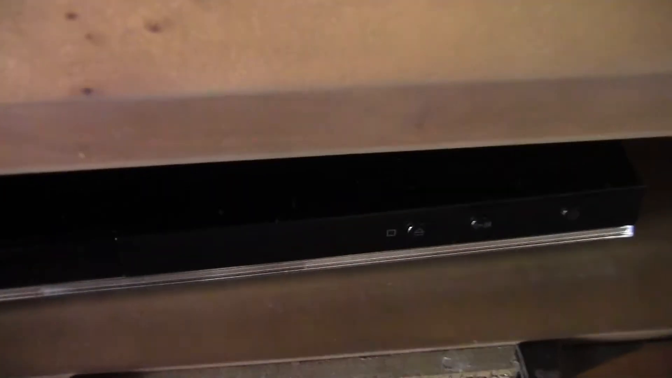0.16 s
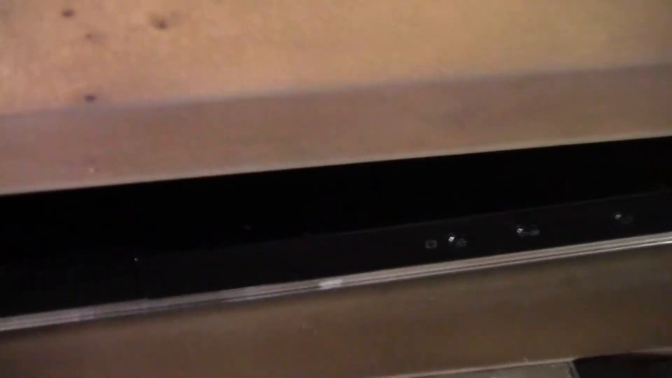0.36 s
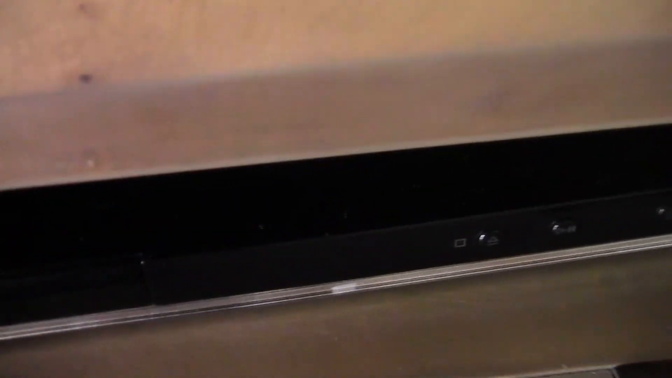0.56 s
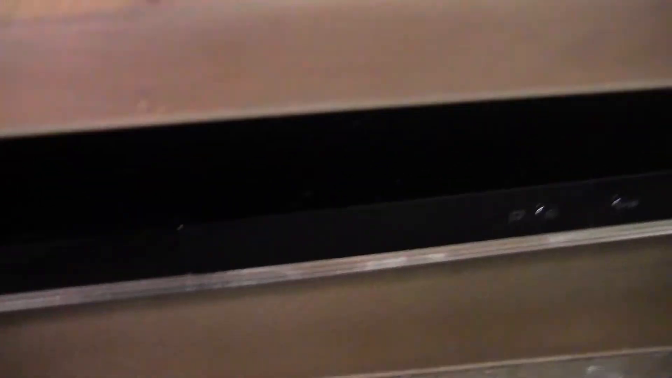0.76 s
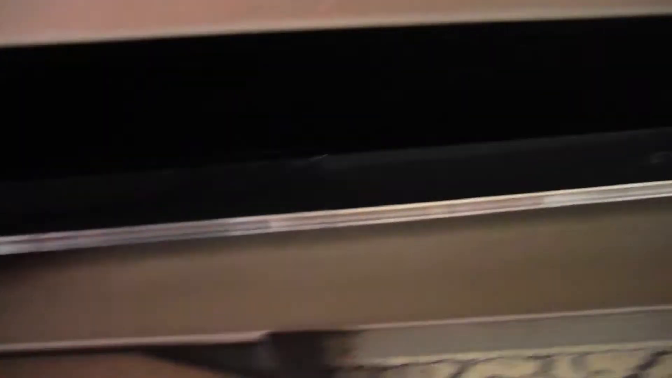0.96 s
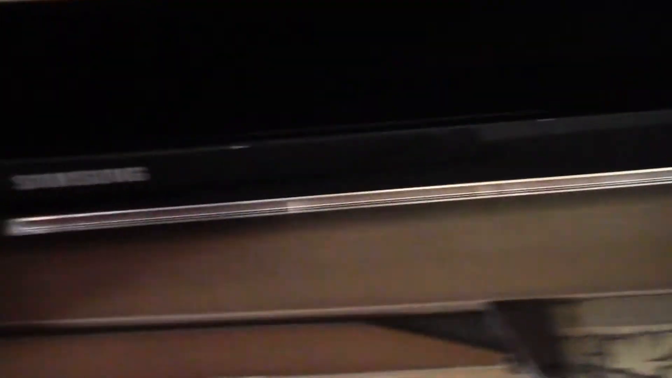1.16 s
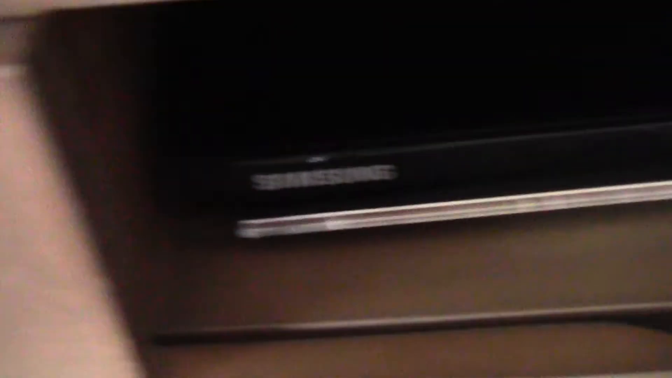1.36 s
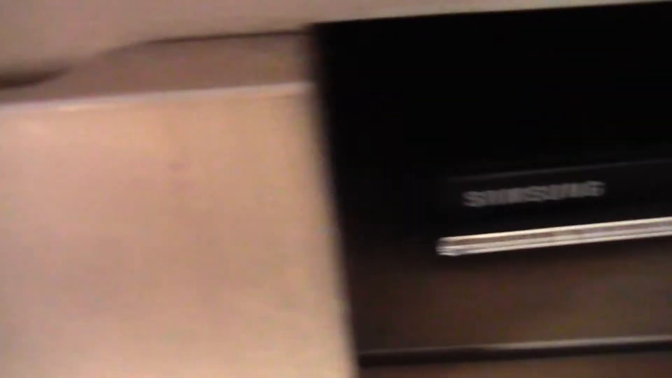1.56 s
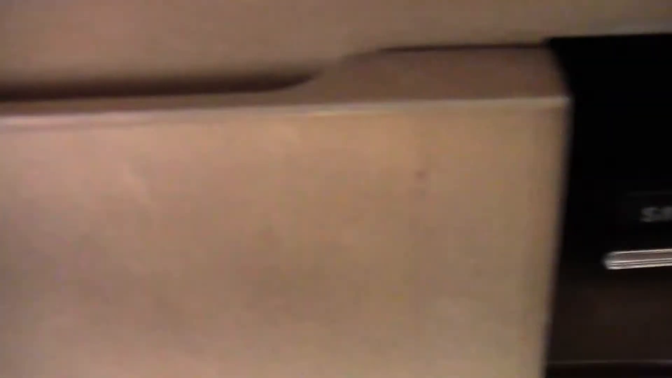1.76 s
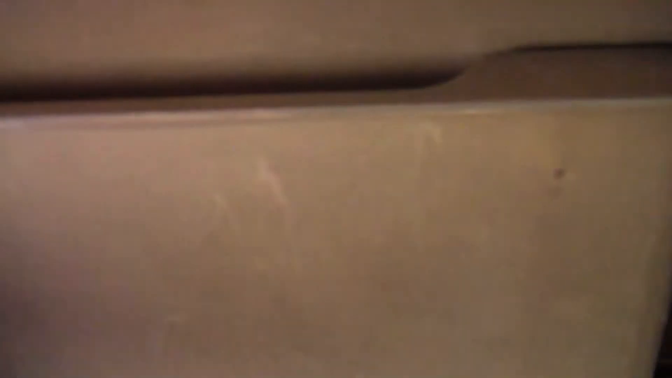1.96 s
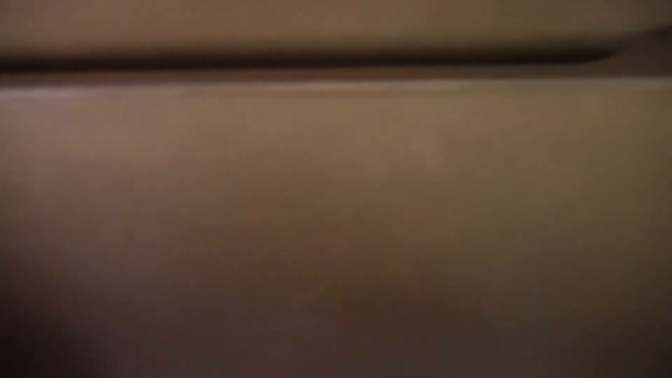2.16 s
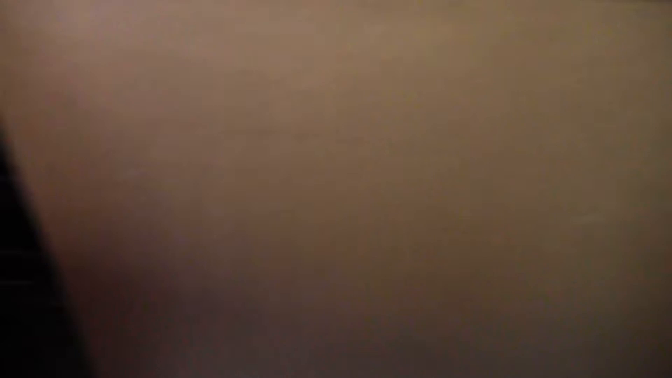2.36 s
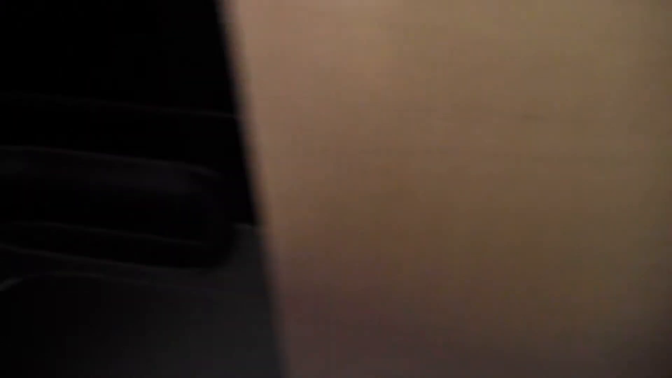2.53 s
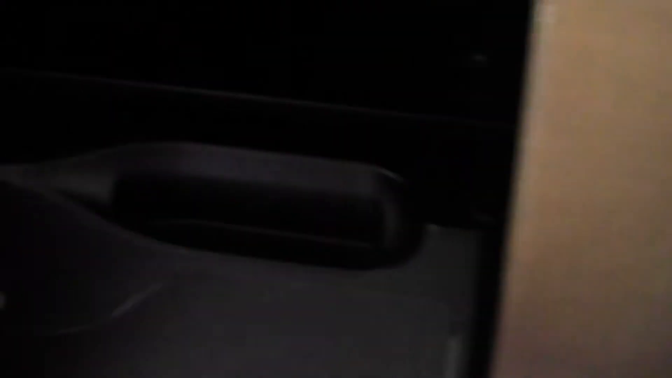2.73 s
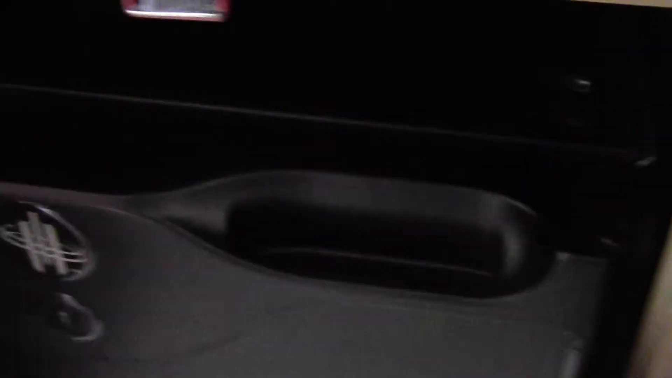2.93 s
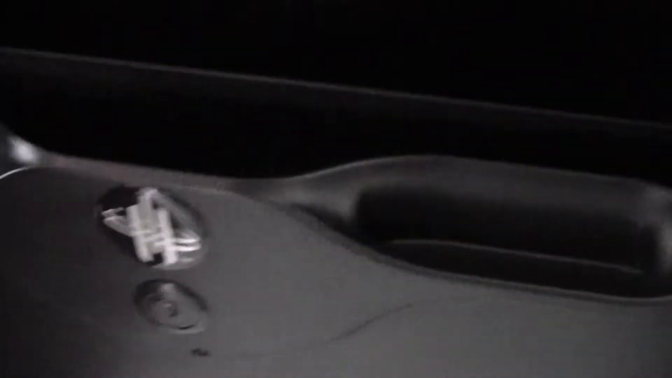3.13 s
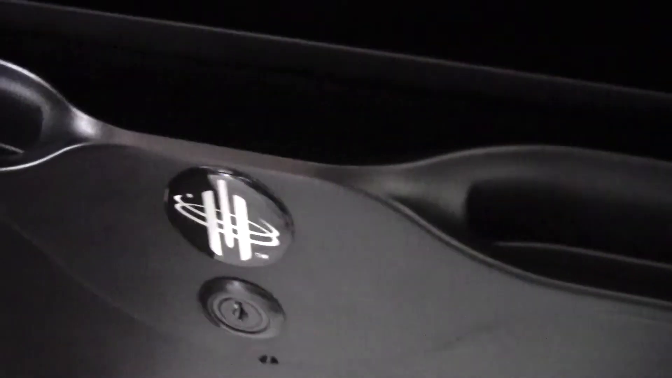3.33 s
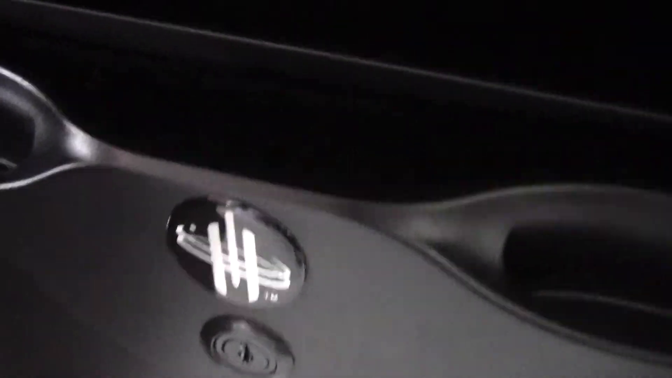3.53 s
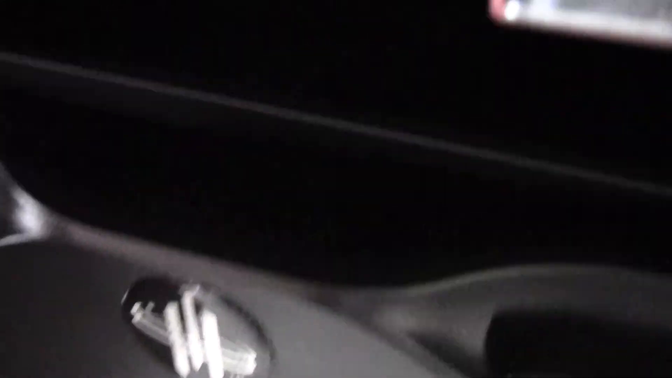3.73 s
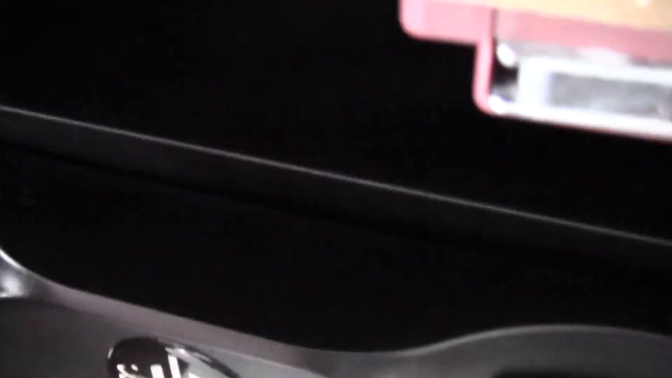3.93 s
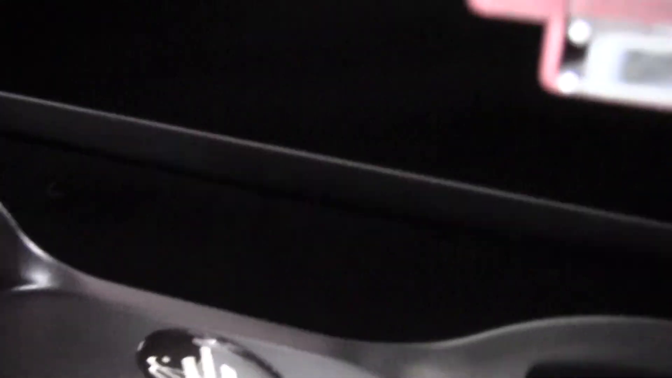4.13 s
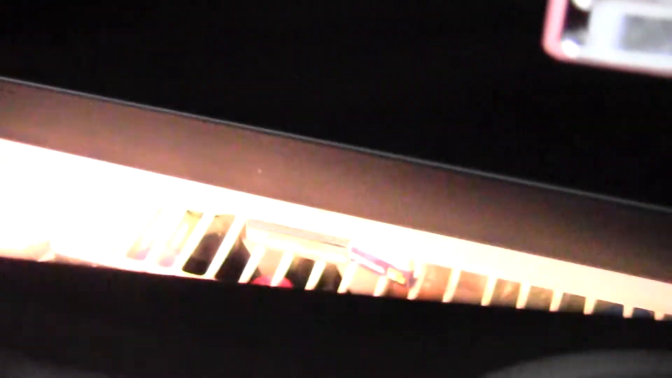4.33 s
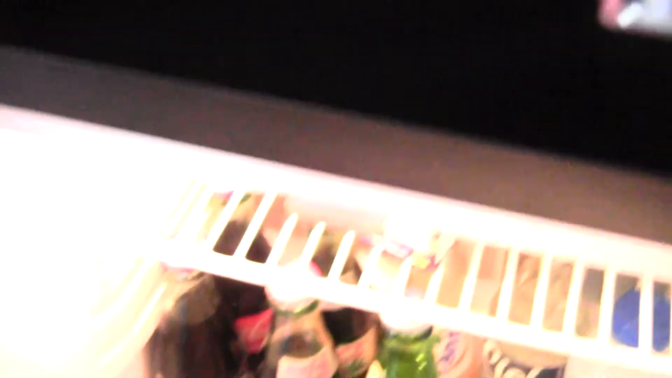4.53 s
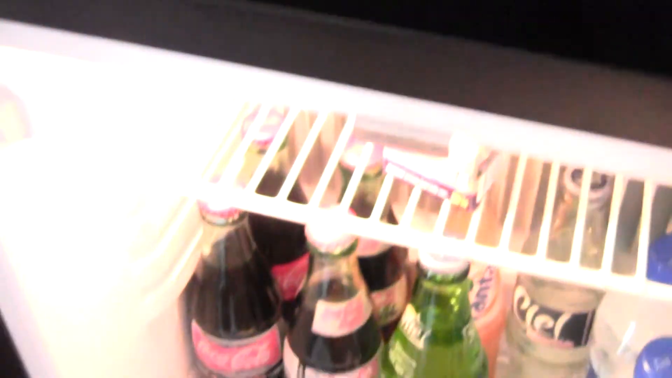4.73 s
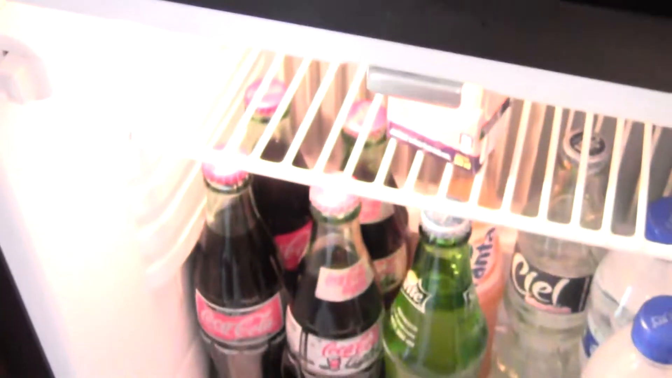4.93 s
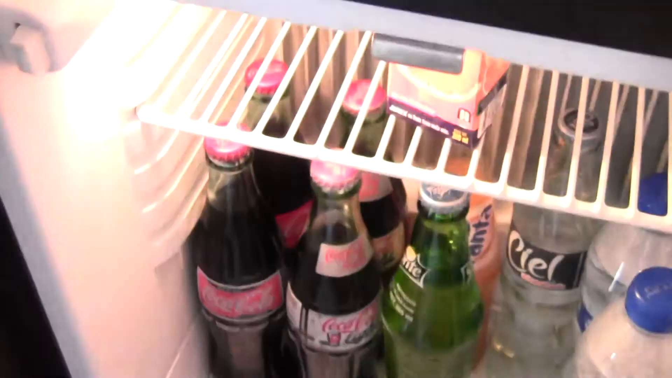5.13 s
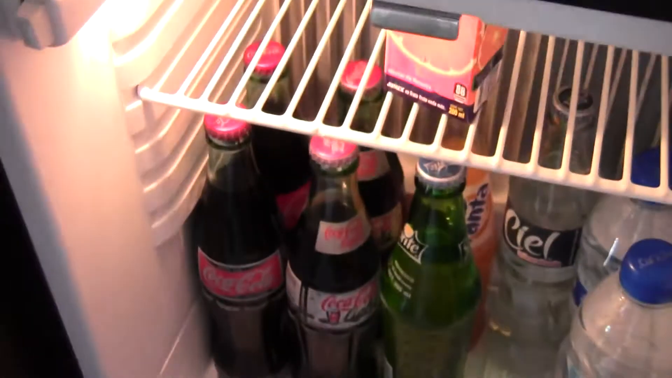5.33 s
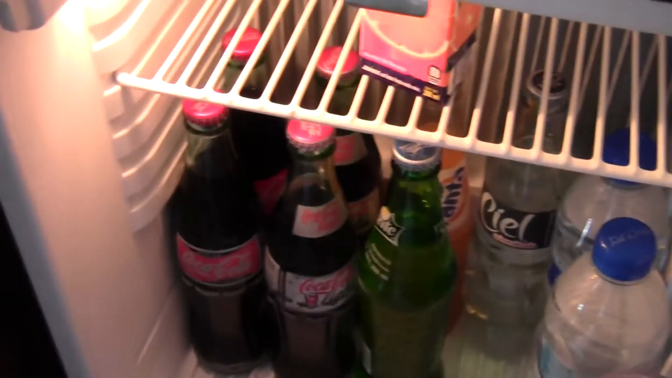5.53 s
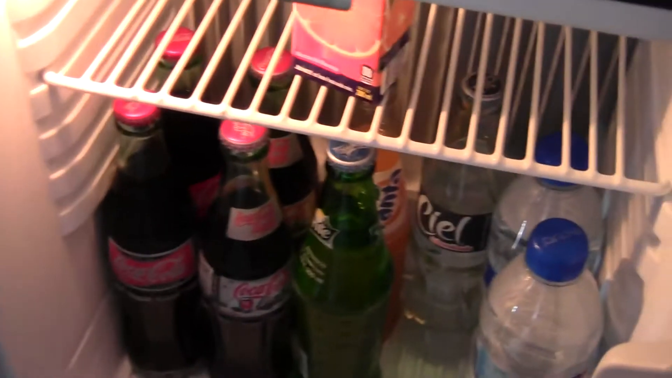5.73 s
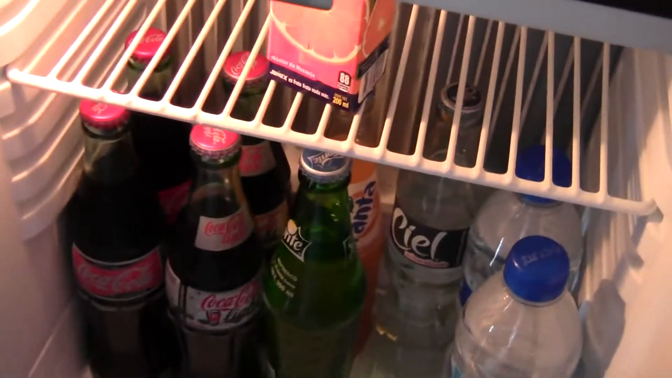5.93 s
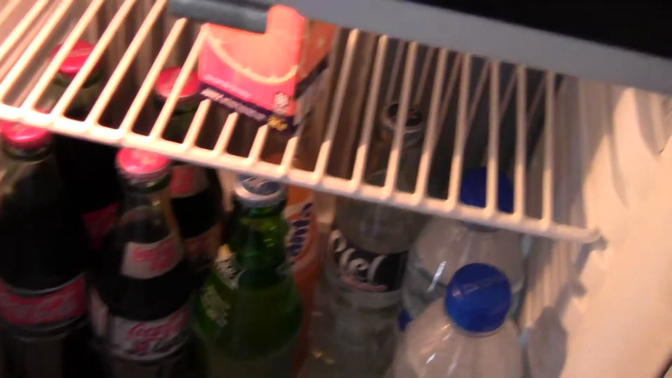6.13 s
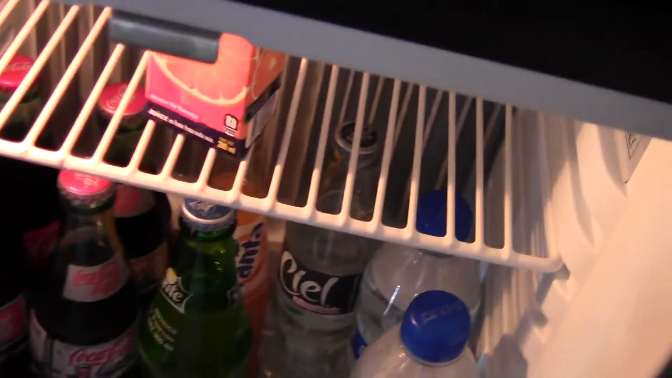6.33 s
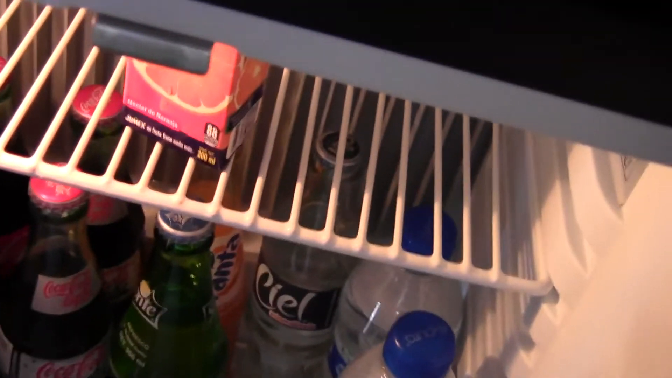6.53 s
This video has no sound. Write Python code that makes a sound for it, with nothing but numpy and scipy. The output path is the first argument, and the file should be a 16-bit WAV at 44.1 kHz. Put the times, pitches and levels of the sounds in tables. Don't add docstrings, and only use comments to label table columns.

```python
import sys
import numpy as np
from scipy import signal
from scipy.io import wavfile
from scipy.ndimage import uniform_filter1d

SR = 44100
rng = np.random.default_rng(int(sys.argv[2]) if len(sys.argv) > 2 else 0)


def volts_from_db(level):
    exponent = np.asarray(level, float) / 20
    return 10 ** exponent


def wav_record(signal):
    frames = np.transpose(np.atleast_2d(signal))
    bounded = np.clip(frames, -1, 1)
    quanta = np.round(bounded * 32767).astype(np.int16)
    wavfile.write(sys.argv[1], SR, quanta)


N = 294489

# frequency in Hz, density in dB per Hz.
AIR_COLOUR = [(20, -54.5), (45, -24), (70, -24.5), (100, 9.5), (150, -8), (300, -3.5), (400, -11.5),
              (560, -10), (800, -13.5), (1800, -19.5), (3000, -27), (7000, -39.5), (11000, -45),
              (15500, -54.5)]
# time in seconds, air level in dB, mains hum in dB, fan whine in dB.
ROOM_LEVELS = [(0, -50, -46, -62), (.7, -49.5, -47, -57.5), (1.3, -50.5, -46.5, -61.5),
               (1.5, -49.5, -46, -71), (2.25, -49, -46, -72), (2.4, -49.5, -48.5, -61),
               (2.8, -50.5, -50.5, -61.5), (3.2, -49.5, -49, -58.5), (3.6, -50.5, -50.5, -74),
               (4, -49, -48.5, -72), (5.3, -49.5, -48.5, -73), (6.68, -50.5, -51, -70)]
# frequency in Hz, width in Hz.
HUM_LINES = [(119.6, 6), (240, 3), (560, 2), (527, 8)]
OCTAVE_DB, OCTAVE_SWING = -55, 1.9
SECOND_DB, SECOND_FADE_DB_PER_S, SECOND_REST_DB = -60, 6.5, -72.5
# frequency in Hz, left-right likeness from 0 to 1.
LIKENESS = [(60, 0.94), (180, 0.99), (550, 0.41), (1650, 0.64), (4970, 0.673), (15000, 0.35)]
# frequency in Hz, t60 in seconds.
ROOM_DECAY = [(100, 0.52), (500, 0.7), (2000, 0.36), (6000, 0.2), (12000, 0.39)]

# frequency in Hz, density in dB per Hz.
CLOTH_COLOUR = [(880, -13.5), (1500, -3.5), (2700, -10.5), (4120, -13), (4500, -14), (9090, -18),
                (15000, -27)]
# start in seconds, hold in seconds, level in dB.
BRUSH_STROKES = [(0, 0.092, -59.5), (.2, 0.19, -63), (.66, 0.22, -63), (.95, 0.15, -66.5),
                 (1.297, 0.22, -65.5), (2.12, 0.024, -59.5), (2.3, 0.44, -66), (2.897, 0.09, -59.5),
                 (3.117, 0.1, -61.5), (3.4, 0.16, -66), (3.72, 0.026, -64), (4.024, 0.059, -64),
                 (5.05, 0.09, -65), (5.6, 0.019, -70), (5.72, .02, -75), (6.1, 0.052, -71.5)]
BRUSH_RISE_DB_PER_S, BRUSH_FALL_DB_PER_S = 97, 45.5

# start in seconds, peak in dB, main mode in Hz, second mode in Hz, t60 in seconds.
CAMERA_BUMPS = [
    (3.2049, -14, 245, 362, 0.025),
    (5.8605, -23.5, 350, 270, 0.066),
    (5.8615, -34, 620, 890, 0.036),
    (5.889, -27, 778, 710, 0.054),
    (5.896, -24.5, 420, 820, 0.022),
]
# start in seconds, peak in dB, main mode in Hz, second mode
# in Hz, t60 in seconds.
DULL_BLOWS = [(1.653, -22.5, 109.3, 74, 0.29), (1.743, -26, 82, 117, 0.22), (1.821, -24, 239.5, 313, 0.23),
              (1.851, -25, 63.5, 121, 0.18), (1.937, -10.5, 255, 300.4, 0.13), (1.939, -10, 610, 490, .06),
              (1.946, -15, 615, 760, 0.046), (1.95, -22, 63.7, 151, 0.15), (1.985, -13, 293, 160.5, 0.14),
              (2.27, -39, 88, 120, 0.17), (2.967, -42, 80, 149, .16), (3.931, -45, 64.3, 99.3, 0.9),
              (4.046, -43, 246, 400, 0.17), (4.189, -23.5, 143, 92, 0.11), (4.193, -34, 216, 326, 0.2),
              (4.292, -21, 237.4, 120, 0.17), (4.394, -19.5, 677, 790, 0.068),
              (4.5415, -9, 784, 1100, 0.02), (4.801, -32, 1336, 2066, .12), (4.69, -30.5, 777, 640, 0.072),
              (4.772, -25.5, 650, 780, 0.052), (4.322, -16.5, 114.8, 185, 0.251),
              (5.899, -26.5, 152, 70, 0.21), (5.911, -34.5, 193, 223, .25), (6.106, -32.5, 150, 77.2, .38),
              (6.141, -39, 186, 304, 0.2)]
SECOND_MODE_DB = -4.5
# start in seconds, lower mode in dB, upper mode in dB.
FRIDGE_DOOR_BOOMS = [(4.427, -22, -15.5), (4.525, -18, -13.5), (4.627, -21, -12.5), (4.671, -21, -33),
                     (4.761, -38, -19.5), (4.874, -23, -14), (4.914, -22, -45), (4.943, -17, -25),
                     (5.139, -48, -36), (5.24, -47.5, -35), (5.331, -55, -38), (5.551, -45, -41.5)]
DOOR_LOW_HZ, DOOR_HIGH_HZ, DOOR_LOW_T60_S, DOOR_HIGH_T60_S, DOOR_RISE_S = 152, 185, 0.27, 0.18, 0.006

# frequency in Hz, width in Hz, level in dB.
WOOD_MODES = [(151, 13, -10), (255, 37, 1.5), (293, 13, -2.5), (400, 22, -10), (610, 100, 0.5),
              (764, 92, -9), (883, 26, -9), (1150, 170, -3), (1510, 190, 1), (1780, 190, -1),
              (2160, 440, -6.5), (2570, 310, -2.5), (3150, 1800, -9), (4200, 1500, -34)]
# start in seconds, peak in dB, treble crack in dB above the body,
# pitch of the struck spot in Hz, t60 in seconds.
CABINET_KNOCKS = [(1.469, -45.5, -20, 2400, .17), (1.4695, -47.5, -28, 1040, 0.88),
                  (1.936, -3.5, -14.5, 4680, 0.022), (1.938, -8, -22, 2740, 0.072),
                  (1.946, -7, -25, 2500, 0.026), (1.964, -16.5, -24, 2390, .048),
                  (1.99, -27, -14, 1460, 0.058), (2.043, -25.5, -10, 6500, 0.021),
                  (2.046, -20.5, -27, 2430, 0.06), (2.049, -28.5, -24, 2960, 0.26),
                  (3.205, -32.5, -16, 1040, 0.025), (3.225, -49, -11, 8500, 0.091),
                  (3.346, -38, -28, 1870, 0.039)]
# start in seconds, peak in dB, crack in dB above the body,
# spot pitch in Hz, t60 in seconds.
CABINET_LATCH = [
    (1.783, -41.5, -6, 2500, 0.18),
    (1.793, -42, -10, 1300, 0.16),
    (1.8205, -24, -30, 1500, 0.047),
    (1.824, -29, -32, 1140, 0.09),
    (1.838, -55, -5, 8500, .03),
]

BOTTLE_MODES_HZ = [
    [3227, 6361, 6489, 8489, 9593, 10860, 8204, 12660, 13070],
    [3333, 5405, 6584, 8726, 3408, 3295],
    [3477, 3278, 5683, 6604, 8823, 9825, 12900, 13590, 15160],
]
# level in dB, t60 in seconds.
BOTTLE_RINGS = [
    [(5, 0.22), (-5, 0.13), (-9, 0.06), (-29.5, 0.092), (-16, 0.065), (-29, .09), (-26, .09),
     (-29.5, 0.1002), (-34.5, .06)],
    [(-1, 0.68), (-15.5, 0.5), (-35, .18), (-30.5, 0.11), (5.5, 0.18), (-9.5, .2)],
    [(6.5, 0.073), (1, 0.11), (-6.5, 0.091), (-3, 0.092), (-3, 0.09), (-15, 0.052), (-20.5, .05),
     (-19, .045), (-21, .04)],
]
# start in seconds, first bottle in dB, second in dB, third in dB,
# seconds until the next touch stills it.
BOTTLE_CLINKS = [(4.296, -40, -37, -32, 0.03), (4.319, -43, -30, -23, 0.034), (4.327, -24, -48, -28, 0.016),
                 (4.359, -42, -39, -53, 0.041), (4.4, -53, -54, -47.5, 0.017), (4.46, -36, -42, -35, 0.039),
                 (4.497, -45, -45, -35.5, 0.019), (4.519, -20, -48, -26.5, .236),
                 (4.526, -15, -28, -39, 0.019), (4.544, -36.5, -34, -45, .21),
                 (4.562, -50, -35, -36.5, 0.022), (4.632, -48, -39, -62, 0.1),
                 (4.799, -56, -42.5, -47, 0.026), (4.808, -55, -49, -60, 0.02),
                 (4.894, -53, -43.5, -52, 0.017), (4.916, -50, -51, -67, .3), (4.932, -54, -50, -51, 0.28),
                 (4.945, -62, -46.5, -63, .4)]
PACKED_SHARE = 0.81

# start in seconds, peak in dB, pitch in Hz.
CAP_TICKS = [(4.2825, -35.5, 10000), (4.3185, -26.5, 10500), (4.3472, -26, 9000), (4.3532, -24.5, 9000),
             (4.3592, -26.5, 9500), (4.432, -42.5, 10000), (4.453, -43.5, 10500), (4.49, -43, 9000),
             (4.582, -44, 10500), (4.7103, -41, 7000), (4.7537, -51, 5000)]
TICK_T60_S, TICK_SPREAD = 0.0063, 0.36
# start in seconds, hold in seconds, level in dB.
SHELF_JOLTS = [
    (4.292, 0.019, -11.5),
    (4.36, 0.088, -19.5),
    (4.5, 0.056, -17.5),
    (4.622, 0.0086, -32),
    (4.692, 0.12, -34),
    (4.83, 0.051, -40),
]
JOLT_RISE_DB_PER_S, JOLT_FALL_DB_PER_S = 897.5, 219.5
# frequency in Hz, width in Hz, level in dB.
PLASTIC_MODES = [(269.6, 103, -7), (487, 64, -4), (640, 59, 0), (762, 91, -2), (926, 67, -3),
                 (1088, 80, -3), (1399, 184, -1.5), (1924, 280, -4.5), (2500, 1800, -4.5)]
# start in seconds, peak in dB, crack in dB above the body,
# spot pitch in Hz, t60 in seconds.
FINGER_TAPS = [(3.934, -56.5, -3, 5900, 0.036), (4.042, -33.5, -16, 3000, 0.12),
               (4.128, -42.5, -1, 5500, 0.012), (4.133, -41, -15, 9300, 0.017),
               (4.143, -41.5, -13, 3330, 0.094), (4.191, -30, -5.5, 2500, 0.079),
               (4.214, -30.5, -14.5, 2500, 0.039), (5.229, -60, 9, 7000, 0.038),
               (5.599, -55.5, -8.5, 6050, .039), (5.825, -45, -20.5, 3590, 0.049),
               (5.829, -47, -19.5, 2040, 0.1), (5.887, -31.5, -24, 2500, 0.03),
               (5.891, -25.5, -25, 1350, 0.043), (6.1, -46.5, -29, 804, 0.096)]
# start in seconds, peak in dB, crack in dB above the body,
# spot pitch in Hz.
SEAL_KNOCKS = [(4.268, -46.5, -11.5, 2798), (4.283, -26, -8, 1070), (4.289, -17.5, -4, 2500),
               (4.2915, -16.5, -20, 1160), (4.296, -19.5, -14, 2304), (4.301, -33, -5, 1212),
               (4.318, -14, -7, 610), (4.346, -18.5, -20.5, 476), (4.352, -26, -15, 603),
               (4.359, -18, -11.5, 834), (4.394, -25, -27.5, 680), (4.429, -31, -15, 643),
               (4.459, -26, -13, 1300), (4.479, -24.5, -25, 1505), (4.489, -21, -14, 1505),
               (4.514, -23.5, -17.5, 925), (4.518, -15.5, -9.5, 755), (4.534, -22, -26.5, 1200),
               (4.5415, -19.5, -30, 800), (4.563, -23.5, -19.5, 3000), (4.582, -29, -14, 1370),
               (4.618, -15, -15, 745), (4.631, -26.5, -33, 778), (4.69, -30, -45, 755),
               (4.714, -30, -33, 622), (4.754, -27, -47, 654), (4.773, -32, -39, 645)]
# start in seconds, peak in dB, crack in dB above the body,
# spot pitch in Hz.
SETTLING_KNOCKS = [
    (4.797, -31, -18, 1530),
    (4.808, -44, -22, 1310),
    (4.827, -17.5, -17, 2640),
    (4.865, -18, -24.5, 1760),
    (4.905, -22.5, -18, 1700),
    (4.932, -20.5, -30, 1470),
]
SHELF_T60_S, SETTLE_T60_S = 0.095, 0.071


def evened(x):
    return x / np.sqrt(np.mean(x ** 2) + 1e-20)


def read(points, hz):
    f, value = np.transpose(points)
    return np.interp(np.log(hz + 1), np.log(f + 1), value)


def add(mix, s, sound):
    part = mix[round(s * SR):][:len(sound)]
    part += sound[:len(part)]


def swell_db(rows, rise_db_per_s, fall_db_per_s):
    t = np.arange(0, N + 32, 32) / SR
    levels = []
    for s, hold, db in rows:
        early, late = np.maximum(s - t, 0), np.maximum(t - s - hold, 0)
        levels.append(db - rise_db_per_s * early - fall_db_per_s * late)
    return np.interp(np.arange(N) / SR, t, np.max(levels, axis=0))


def resonate(x, hz, width):
    r, turn = np.exp(-np.pi * width / SR), 2 * np.pi * hz / SR
    return signal.lfilter([(1 - r * r) / 2, 0, -(1 - r * r) / 2], [1, -2 * r * np.cos(turn), r * r], x)


def broad_resonance(x, hz, spread):
    return resonate(resonate(x, hz, spread * hz), hz, spread * hz)


def ring(hz, db, t60, rise, phase):
    t = np.arange(int(1.2 * t60 * SR)) / SR
    return volts_from_db(db - 60 * t / t60) * (1 - np.exp(-t / rise)) * np.sin(2 * np.pi * (hz * t + phase))


def noise(colour, patchy_db):
    frames, hz = N // 256 + 5, np.fft.rfftfreq(1024, 1 / SR)
    a, b, c, d, patches = rng.standard_normal((frames, 513, 5)).T
    patches = uniform_filter1d(patches, size=12, axis=0)
    patches = evened(uniform_filter1d(patches, size=14, axis=1))
    same = np.clip(read(LIKENESS, hz), -1, 1)[:, None]
    left, other = a + 1j * b, c + 1j * d
    z = np.array([left, same * left + np.sqrt(1 - same ** 2) * other])
    z *= volts_from_db(read(colour, hz)[:, None] + patchy_db * patches)
    return evened(signal.istft(z, nperseg=1024, noverlap=768)[1][:, :N])


def room_tone():
    s, *levels_db = np.transpose(ROOM_LEVELS)
    t = np.arange(N) / SR
    air_db, hum_db, fan_db = (np.interp(t, s, db) for db in levels_db)
    octave_db = OCTAVE_DB + OCTAVE_SWING * (hum_db - hum_db[0])
    second_db = np.maximum(SECOND_DB - SECOND_FADE_DB_PER_S * t, SECOND_REST_DB)
    out = volts_from_db(air_db) * noise(AIR_COLOUR, 0.89)
    for (hz, width), db in zip(HUM_LINES, (hum_db, octave_db, fan_db, second_db)):
        waver = evened(resonate(rng.standard_normal(N), hz, width))
        out += volts_from_db(db) * evened(np.sin(2 * np.pi * hz * t) + 0.399 * waver)
    return out


def room(x):
    taps = np.zeros((2, SR))
    at = np.arange(300, SR - 20, 20) + rng.integers(0, 20, (2, (SR - 301) // 20))
    np.put_along_axis(taps, at, rng.choice([-1., 1.], at.shape), 1)
    taps = taps[0] + 0.14 * taps
    hz, t, z = signal.stft(taps, SR, nperseg=256)
    tail = signal.istft(z * volts_from_db(-60 * t / read(ROOM_DECAY, hz)[:, None]), SR, nperseg=256)[1]
    return signal.fftconvolve(x[None], tail / np.linalg.norm(tail[0]), axes=1)[:, :N]


def ports(x):
    t = np.arange(800) / SR
    scatter = rng.standard_normal(800) * volts_from_db(-60 * t / 0.02)
    side = signal.oaconvolve(np.diff(x, prepend=0), scatter / np.linalg.norm(scatter))[:N]
    return x * volts_from_db(np.array([[0.12], [-0.12]])) + volts_from_db(-10.5) * np.array([side, -side])


def rustle():
    brush = volts_from_db(swell_db(BRUSH_STROKES, BRUSH_RISE_DB_PER_S, BRUSH_FALL_DB_PER_S))
    grains = rng.exponential(1, N // 40 + 1).repeat(40)[:N]
    grain = volts_from_db(1.6 * uniform_filter1d(grains, size=40))
    return volts_from_db(3.0) * brush * noise(CLOTH_COLOUR, 2.2) * evened(grain)


def blows(rows):
    out = np.zeros(N)
    for s, db, main_hz, second_hz, t60 in rows:
        rise = 0.6 / min(main_hz, second_hz)
        main = ring(main_hz, db, t60, rise, 0)
        add(out, s, main + ring(second_hz, db + SECOND_MODE_DB, t60, rise, 0))
    return out


def panels():
    out = blows(DULL_BLOWS)
    for s, low_db, high_db in FRIDGE_DOOR_BOOMS:
        add(out, s, ring(DOOR_LOW_HZ, low_db, DOOR_LOW_T60_S, DOOR_RISE_S, 0))
        add(out, s, ring(DOOR_HIGH_HZ, high_db, DOOR_HIGH_T60_S, DOOR_RISE_S, 0))
    return out


def body(drive, modes):
    click = np.eye(1, 4096)[0]
    shape = np.zeros(4096)
    for k, (hz, width, db) in enumerate(modes):
        shape += (-1) ** k * volts_from_db(db) * resonate(click, hz, width) / np.sqrt(width)
    shape = signal.lfilter(*signal.butter(2, 2.14 * modes[-1][0], fs=SR), shape)
    return signal.oaconvolve(drive, shape / np.linalg.norm(shape))[:N]


def knocks(rows, modes, crack_share, crack_hz, snap, gain_db, spot_db, spot_slope):
    blow, bright, t = np.zeros(N), np.zeros(N), np.arange(SR // 5) / SR
    chatter = rng.standard_normal((len(rows), 3, len(t)))
    band = signal.butter(3, crack_hz, "bandpass", fs=SR, output="sos")
    first = 1 + snap * np.exp(-t / 0.00024)
    for (s, db, crack_db, spot_hz, t60), (low, high, spot) in zip(rows, chatter):
        quick = first * volts_from_db(db - 60 * t / (crack_share * t60))
        local = volts_from_db(spot_db + spot_slope * db) * np.sqrt(9000 / spot_hz)
        add(blow, s, first * volts_from_db(db + gain_db - 60 * t / t60) * low)
        add(bright, s, volts_from_db(crack_db) * signal.sosfilt(band, quick * high))
        add(bright, s, local * broad_resonance(quick * spot, spot_hz, 0.42))
    return body(blow, modes) + bright


def cabinet():
    door = knocks(CABINET_KNOCKS, WOOD_MODES, 0.52, [2800, 10500], 2.0, -4.5, -1.7, -0.076)
    return door + knocks(CABINET_LATCH, WOOD_MODES, 0.54, [2800, 8000], 0.93, -7, 1.5, -0.057)


def glass():
    out, chance = np.zeros(N), rng.random((len(BOTTLE_CLINKS), 3, 9, 2))
    t = np.arange(SR // 2) / SR
    for (s, *levels_db, free), draws in zip(BOTTLE_CLINKS, chance):
        clink = np.zeros(len(t))
        for level_db, pitches, modes, draw in zip(levels_db, BOTTLE_MODES_HZ, BOTTLE_RINGS, draws):
            for hz, (db, t60), (phase, spot) in zip(pitches, modes, draw):
                mode_db = level_db + db + 7 * (spot - 0.5)
                add(clink, 0, ring(hz, mode_db, t60 * PACKED_SHARE, 0.0019, phase))
        add(out, s, clink * volts_from_db(-14 * np.clip((t - free) / 0.0035, 0, 1)))
    return out


def ticks():
    out, t = np.zeros(N), np.arange(SR // 40) / SR
    for (s, db, hz), puff in zip(CAP_TICKS, rng.standard_normal((len(CAP_TICKS), len(t)))):
        contact = volts_from_db(db + 5.5 - 60 * t / TICK_T60_S) * puff
        add(out, s, broad_resonance(contact, hz, TICK_SPREAD))
    return out


def shelves():
    shake = volts_from_db(swell_db(SHELF_JOLTS, JOLT_RISE_DB_PER_S, JOLT_FALL_DB_PER_S) - 12.5)
    strength = volts_from_db(3.0 * np.minimum(rng.exponential(1, N), 5))
    struck = rng.random(N) < 800 / SR
    taps = strength * struck * rng.choice([-1, 1], N)
    return shake * body(evened(taps), PLASTIC_MODES)


def fridge():
    shaken = [(*row, SHELF_T60_S) for row in SEAL_KNOCKS]
    settled = [(*row, SETTLE_T60_S) for row in SETTLING_KNOCKS]
    rows = FINGER_TAPS + shaken + settled
    door = knocks(rows, PLASTIC_MODES, 0.67, [3000, 9500], 0.27, -6.5, -2, -0.081)
    return door + shelves() + ticks()


def scene():
    wood, plastic, bottles, booms = cabinet(), fridge(), glass(), panels()
    wet = room(volts_from_db(-11) * wood + volts_from_db(-14.0) * plastic + volts_from_db(-7.5) * bottles + volts_from_db(-10.5) * booms)
    close = ports(wood + plastic + bottles + booms + blows(CAMERA_BUMPS))
    return close + wet + room_tone() + rustle()


def band_limit(x):
    return signal.sosfilt(signal.butter(12, 15780, fs=SR, output="sos"), x)


def record(dry):
    soft = 1.3 * np.tanh(dry / 1.3)
    dull = signal.sosfilt(signal.butter(3, [45, 10800], "bandpass", fs=SR, output="sos"), soft)
    hiss = volts_from_db(-79.5) * (rng.standard_normal(N) + 0.67 * rng.standard_normal(dry.shape))
    edge = signal.firwin(511, 15800, window=("kaiser", 9), fs=SR)
    return band_limit(signal.oaconvolve(dull + hiss, edge[None], "same"))


dry = scene()
out = record(dry)
wav_record(out)
```